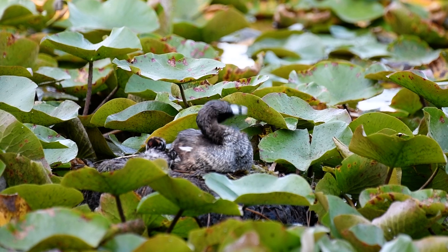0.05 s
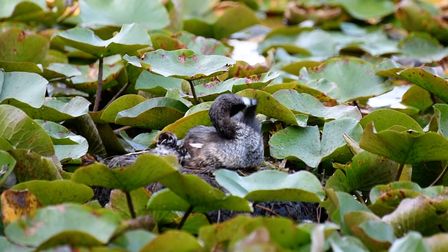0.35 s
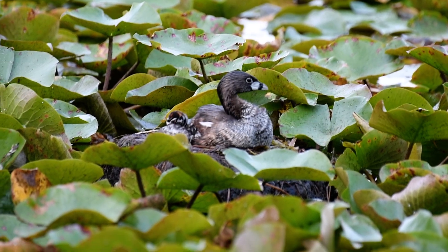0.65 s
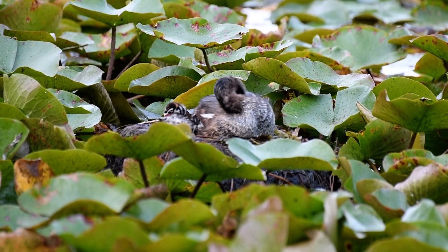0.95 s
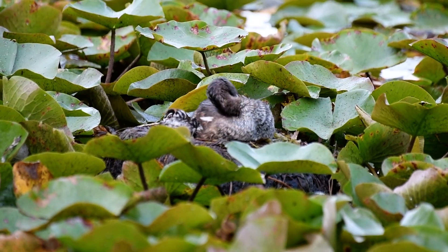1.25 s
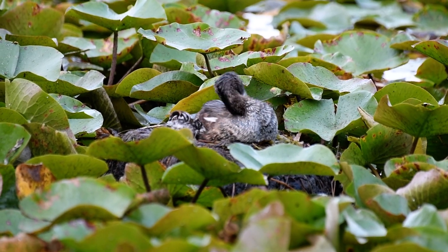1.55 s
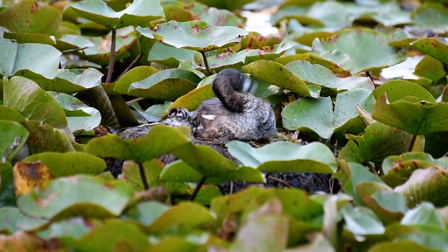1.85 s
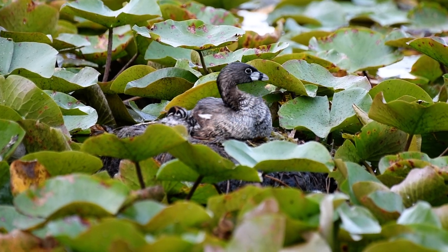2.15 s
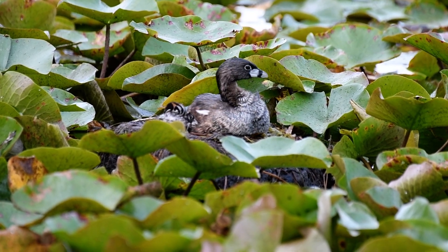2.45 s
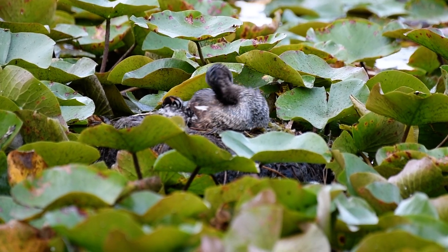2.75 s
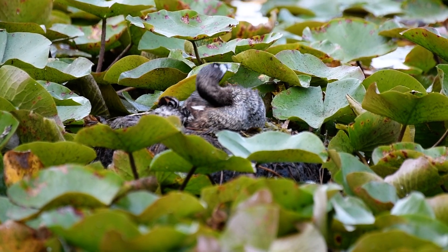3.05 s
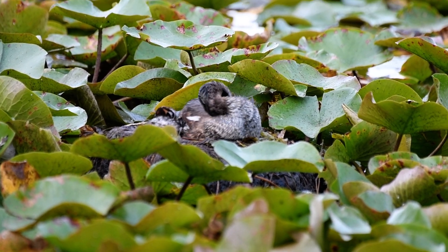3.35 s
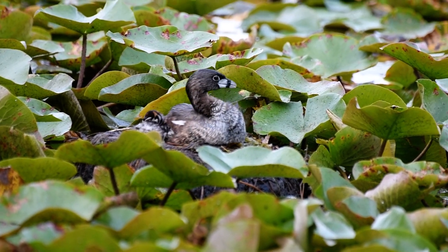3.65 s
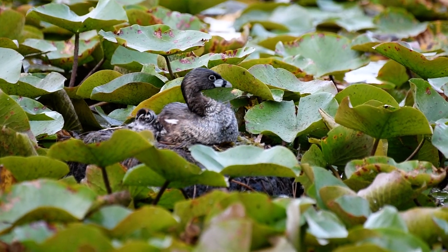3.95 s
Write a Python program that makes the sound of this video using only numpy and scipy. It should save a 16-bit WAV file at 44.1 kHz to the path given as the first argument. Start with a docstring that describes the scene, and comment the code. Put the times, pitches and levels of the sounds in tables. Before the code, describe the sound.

Two distant engines drone over a low rumble and faint hiss at a pond for all four seconds, one slowing slightly until about 2.4 seconds. Close, sharp plastic camera clicks come on the right at 0.3 to 0.4 seconds, and one on the left at 3 seconds. Small birds whistle thinly until about 2.6 seconds, with a brief chip at 3.5. Soft high rustles come and go.

```python
"""Two far-off engines drone over a lily pond, and one of them slows a little.
Each drone is a stack of tones that follow the engine's speed and waver in the moving air.
A handled camera gives a few sharp clicks and creaks that ring its plastic shell, mostly on the right.
Small birds whistle thinly and chip. Behind it all lies a low outdoor rumble with a faint hiss,
and soft high rustles come and go."""
import sys
import numpy as np
from scipy import signal
from scipy.fft import rfft, irfft
from scipy.io import wavfile
from scipy.ndimage import uniform_filter1d

SR = 44100
rng = np.random.default_rng(int(sys.argv[2]) if len(sys.argv) > 2 else 0)


def generate_wav(signal):
    """Clip the signal to [-1, 1] and save it as 16-bit WAV at the path in sys.argv[1]."""
    frames = np.transpose(np.atleast_2d(signal))
    scaled = np.clip(frames, -1, 1) * 32767
    pcm = np.round(scaled).astype(np.int16)
    wavfile.write(sys.argv[1], SR, pcm)


N = 176400  # 4 seconds

# How fast each engine runs: time_s, speed_hz
STEADY_ENGINE_SPEED = [(0, 21.7), (.8, 21.9), (1.7, 21.5), (2.6, 21.4), (3.3, 21.32), (4, 21.35)]
SLOWING_ENGINE_SPEED = [(0, 20.24), (1.4, 18.8), (1.95, 19.1), (2.4, 18.33), (4, 18.44)]
# The tones in each drone: multiple_of_speed, level_db
STEADY_ENGINE_TONES = [(7, -62), (8, -37), (10, -56.5), (12, -46), (13, -53.5), (14, -55.5), (16, -48),
                       (17, -62.5), (18, -69.5), (21, -68), (26, -60.5), (27, -59.5), (28, -66),
                       (29, -65.5), (33, -62.5)]
SLOWING_ENGINE_TONES = [(4, -56), (6, -54), (8, -41), (10, -50.5), (12, -60.5), (14, -56.5), (16, -45),
                        (18, -53.5), (19, -62.5)]
# Camera clicks: start_s, snap_gain_db, creak_gain_db, creak_length_s, low_cut_hz, high_cut_hz,
# boost_hz, boost_db, left_minus_right_db
CAMERA_CLICKS = [(0.3106, -2.5, -25, 0.0066, 790, 7400, 3460, 11, -5),
                 (0.3524, -28, -35, 0.0053, 700, 11000, 1770, 14, -6),
                 (0.366, -39, -25.5, 0.0047, 905, 2300, 1800, 5.5, -6),
                 (0.4063, -6, -14.5, 0.0074, 1720, 6900, 5600, 3.5, -11),
                 (0.4178, -5, -18, 0.01, 1770, 7160, 4650, 5.5, -9),
                 (3.0369, -8.5, -18.5, 0.0068, 250, 11500, 6000, 2.5, 7)]
# The tones the camera's shell rings with: pitch_hz, fade_by_60_db_s, left_gain_db, right_gain_db
SHELL_TONES = [(1130, 0.0032, -26, -7), (1540, 0.0075, -22, -15), (1960, 0.012, -26, -6.5),
               (2430, 0.0065, -26, -5), (3350, 0.0026, -45, -6.5), (4390, 0.0052, -10, -12),
               (5300, 0.0025, -27, -10), (6100, 0.0072, -5.5, -12), (7020, 0.0032, -28, -10.5),
               (8230, 0.0028, -15, -7), (11700, 0.0035, -15, -46)]
# Bird whistles: start_s, length_s, first_pitch_hz, dip_hz, second_pitch_hz, end_hz, level_db,
# level_change_db
BIRD_WHISTLES = [(.162, .085, 5200, 5150, 5100, 5000, -63, -7), (.39, .175, 5400, 5680, 5400, 4500, -66, 1),
                 (.822, .175, 4950, 4600, 5600, 3900, -60, -11),
                 (1.082, .15, 4420, 4300, 5150, 4200, -61, -10),
                 (1.522, .25, 4980, 4880, 5500, 4050, -60.5, -9),
                 (1.783, .15, 5380, 5300, 5350, 4300, -66, -3),
                 (2.468, .14, 4700, 4400, 4800, 5100, -66, -4)]
# Very short bird calls: middle_s, pitch_hz, level_db
BIRD_CHIPS = [(.108, 5300, -52.5), (.838, 5350, -57), (2.198, 5350, -58), (2.876, 5300, -64),
              (3.547, 5350, -49.5)]
# When the rustles swell: middle_s, half_length_s, gain_db
RUSTLE_SWELLS = [(0.05, 0.066, 1), (0.79, .05, -3), (1.123, 0.075, -12), (1.479, 0.062, -3.5),
                 (1.74, 0.047, 0), (2.14, .06, -4), (2.417, .06, -3.5), (2.831, 0.062, -2),
                 (3.504, 0.076, 0.5)]
# How strong the rustles and the rumble are from low to high: frequency_hz, level_db_per_hz
RUSTLE_SPECTRUM = [(1000, -115), (2800, -87.5), (4200, -102.5), (5900, -90.5), (7000, -101), (9000, -111),
                   (15000, -128)]
RUMBLE_SPECTRUM = [(12, -102), (28, -82), (45, -68.5), (75, -65), (115, -65), (200, -64), (300, -69),
                   (400, -75), (490, -81), (590, -78), (820, -74), (1100, -77.5), (1500, -81.5),
                   (2000, -85.5), (3000, -90), (4000, -94), (5600, -95.5), (6500, -99.5), (7300, -103),
                   (8600, -106.5), (10500, -110), (15800, -113.5)]
# How alike the background is on the two sides (1 is the same): frequency_hz, likeness
STEREO_LIKENESS = [(60, .993), (130, .98), (290, .96), (640, .68), (1410, .1), (3100, -.15), (15000, 0)]
# Which way the engines and the background lean: frequency_hz, left_minus_right_db
STEREO_BALANCE = [(60, -.5), (200, -.7), (350, 1.5), (700, -2.3), (1700, -2.5), (3000, 0), (5000, -2.5),
                  (8000, 0), (15000, 0)]
# Narrow gaps in the treble that the recorder picks up: middle_hz, width_hz
TREBLE_GAPS = [(7650, 520), (9580, 500)]


def engine(speeds, tones, waver_per_hz=.16 / 298, left_delay_s=.00013):
    """Tones locked to the engine's cycle. Moving air shakes each one, the high ones most."""
    cycles = np.cumsum(np.interp(np.arange(N) / SR, *np.transpose(speeds))) / SR
    out = np.zeros((2, N))
    for multiple, level_db in tones:
        hz = multiple * speeds[0][1]
        tone = np.exp(2j * np.pi * (multiple * cycles + rng.random()))
        tone *= 1 + waver_per_hz * hz * drift(rate_hz=4.8)
        echo_shift = .17 * rng.uniform(-.11, 1)  # ground echoes shift the wave a little
        left_lag = 2 * np.pi * hz * left_delay_s + echo_shift
        both_sides = np.real([tone * np.exp(-1j * left_lag), tone])
        out += pan(read(STEREO_BALANCE, hz)) * amp(level_db) * np.sqrt(2) * both_sides
    return out


def camera_clicks(size=4096, slips_per_s=4700, left_delay_s=.000025):
    """A snap and a run of tiny slips ring the camera's shell; each spot favours its own pitch range."""
    t = np.arange(size) / SR
    hz = np.fft.rfftfreq(size, 1 / SR) + 1
    ring = rfft(shell_ring(t)) * np.exp(-2j * np.pi * np.outer([left_delay_s, 0], hz))
    out = np.zeros((2, N))
    for start_s, snap_db, creak_db, creak_s, low_hz, high_hz, boost_hz, boost_db, pan_db in CAMERA_CLICKS:
        slips = (rng.random(size) < slips_per_s / SR) * rng.choice([-1., 1.], size)
        force = amp(snap_db) * (t == 0) + amp(creak_db) * slips * np.exp(-(t / creak_s) ** 2)
        boost = amp(boost_db * np.exp(-(np.log2(hz / boost_hz) / .25) ** 2))
        band = 1 / np.sqrt((1 + (low_hz / hz) ** 12) * (1 + (hz / high_hz) ** 6))
        click = irfft(ring * rfft(force) * causal(boost * band), size)
        add(out, start_s, amp(-6) * pan(pan_db) * click)
    return out


def shell_ring(t):
    """One tap on the plastic shell: a tick and a few tones that die away fast."""
    ring = amp(-11.5) * pan(-17) * np.exp(-t / .00026)  # the tick
    for k, (hz, fade_s, left_db, right_db) in enumerate(SHELL_TONES):
        tone = np.sin(2 * np.pi * hz * t + k * np.pi)  # every other tone starts downward
        ring += amp([[left_db], [right_db]]) * die_away(t, fade_s) * tone
    return ring


def birds():
    """Thin whistles and chips, with a faint echo from the banks."""
    t = np.arange(N) / SR
    calls = np.zeros(N)
    for start_s, *call in BIRD_WHISTLES:
        add(calls, start_s, whistle(*call))
    for middle_s, hz, level_db in BIRD_CHIPS:
        rough_tone = (drift(rate_hz=450) * np.exp(2j * np.pi * hz * t)).real
        blip = np.exp(-((t - middle_s) / .004) ** 2)
        calls += amp(level_db) * np.sqrt(2) * blip * rough_tone
    tail = rng.standard_normal((2, SR)) * die_away(t[:SR], fade_s=.35)
    echo = signal.fftconvolve(calls[None], tail / np.linalg.norm(tail[0]), axes=1)[:, :N]
    return pan(-3) * (calls + amp(-7) * echo)


def whistle(length_s, first_hz, dip_hz, second_hz, end_hz, level_db, change_db):
    """A wobbling tone that scoops up, then in most calls dips, rises again and slides down."""
    scoop_s, fade_in_s, fade_out_s = .026, .008, .012
    t = np.arange(0, length_s, 1 / SR)
    # The pitch makes four smooth slides between five turning points.
    turns_s = np.r_[0, scoop_s + (length_s - scoop_s) * np.r_[0, .22, .68, 1]]
    progress = np.interp(t, turns_s, np.arange(5))
    slide, along = np.minimum(progress.astype(int), 3), progress % 1
    curve = np.sin(np.pi * along / 2)
    eased = np.select([slide == 0, slide == 3], [curve, along ** 2], curve ** 2)
    hz = np.interp(slide + eased, np.arange(5), [.75 * first_hz, first_hz, dip_hz, second_hz, end_hz])
    wobble = drift(rate_hz=50)[:len(t)]
    tone = np.sin(2 * np.pi * np.cumsum(hz * (1 + .011 * wobble.real)) / SR)
    loudness = amp(level_db + change_db * t / length_s + 3.2 * wobble.imag)
    fades = np.clip(t / fade_in_s, 0, 1) * np.clip((length_s - t) / fade_out_s, 0, 1) ** .5
    return loudness * np.sqrt(2) * fades * tone


def rustles():
    """High, soft noise that comes and goes in short swells."""
    t = np.arange(N) / SR
    swells = sum(amp(gain_db) * np.exp(-.5 * ((t - middle_s) / half_s) ** 4)
                 for middle_s, half_s, gain_db in RUSTLE_SWELLS)
    return swells * surrounding_noise(RUSTLE_SPECTRUM, patch_db=1.0)


def rumble():
    """Low outdoor rumble and faint hiss, gently rising and falling."""
    return surrounding_noise(RUMBLE_SPECTRUM, patch_db=.82) * amp(1.5 * drift(rate_hz=1.5).real)


def surrounding_noise(spectrum, patch_db, size=1024):
    """Noise from all around, with drifting louder and softer patches from low to high."""
    frames = dict(nperseg=size, noverlap=size * 3 // 4)
    left, other = signal.stft(rng.standard_normal((2, N)), **frames)[2]
    likeness = read(STEREO_LIKENESS, np.fft.rfftfreq(size, 1 / SR))[:, None]
    right = likeness * left + np.sqrt(1 - likeness ** 2) * other
    patches = uniform_filter1d(rng.standard_normal(left.shape), size=12, axis=0)  # smooth over pitch
    patches = unit_level(uniform_filter1d(patches, size=14, axis=1))  # and over time
    noise = signal.istft(np.array([left, right]) * amp(patch_db * patches), **frames)[1][:, :N]
    hz = np.fft.rfftfreq(N, 1 / SR)
    level_db = read(spectrum, hz) + np.outer([.5, -.5], read(STEREO_BALANCE, hz))
    return irfft(rfft(noise) * amp(level_db), N) * np.sqrt(SR / 2)


def drift(rate_hz):
    """A smooth random wander; its real and imaginary parts move independently."""
    noise = rng.standard_normal(N) + 1j * rng.standard_normal(N)
    return unit_level(np.fft.ifft(noise * np.exp(-(np.fft.fftfreq(N, 1 / SR) / rate_hz) ** 2)))


def causal(gain):
    """Turns a gain curve into a filter that rings only after it is struck."""
    log_gain = np.log(np.maximum(gain, 1e-4))
    mirrored = np.r_[log_gain, log_gain[-2:0:-1]]
    return np.exp(np.conj(signal.hilbert(mirrored)))[:len(gain)]


def die_away(t, fade_s):
    """A fade that falls 60 dB in fade_s."""
    return np.exp(-np.log(1000) * t / fade_s)


def amp(db):
    """Turns decibels into a gain."""
    return 10 ** (np.asarray(db) / 20)


def unit_level(x):
    """Scales a signal to an average (rms) level of 1."""
    return x / np.sqrt(np.mean(abs(x) ** 2) + 1e-20)


def read(table, hz):
    """Reads between a table's rows, spacing frequencies by octaves."""
    row_hz, values = np.transpose(table)
    return np.interp(np.log(hz + 1), np.log(row_hz + 1), values)


def pan(left_minus_right_db):
    """Left and right gains that lean a sound to one side."""
    return amp(np.array([[left_minus_right_db], [-left_minus_right_db]]) / 2)


def add(mix, start_s, sound):
    """Mixes a sound in at its start time."""
    part = mix[..., max(round(start_s * SR), 0):][..., :sound.shape[-1]]
    part += sound[..., :part.shape[-1]]


def scene():
    """Engines, rumble, rustles and birds far off; the camera close by."""
    steady = engine(STEADY_ENGINE_SPEED, STEADY_ENGINE_TONES)
    slowing = engine(SLOWING_ENGINE_SPEED, SLOWING_ENGINE_TONES)
    return steady + slowing + rumble() + rustles() + birds() + camera_clicks()


def record(dry, gap_depth_db=21.5, silence_s=.033, fade_in_s=.004, top_hz=15800):
    """A brief silence, then a quick fade-in. The treble has two narrow gaps and loses its very top."""
    hz = np.fft.rfftfreq(N, 1 / SR)
    cut_db = sum(gap_depth_db / (1 + (2 * (hz - middle_hz) / width_hz) ** 2)
                 for middle_hz, width_hz in TREBLE_GAPS)
    fade_in = np.clip((np.arange(N) / SR - silence_s) / fade_in_s, 0, 1)
    sound = irfft(rfft(dry) * amp(-cut_db), N) * fade_in
    low_pass = signal.firwin(511, top_hz, window=("kaiser", 9), fs=SR)
    return signal.oaconvolve(sound, low_pass[None], "same")


dry = scene()
out = record(dry)
generate_wav(out)
```